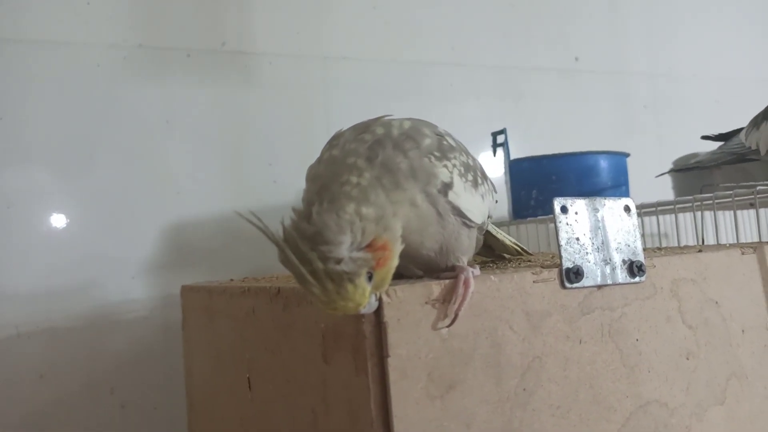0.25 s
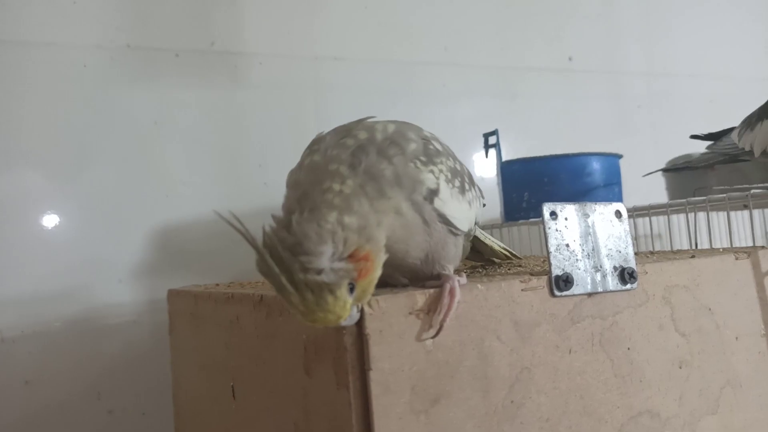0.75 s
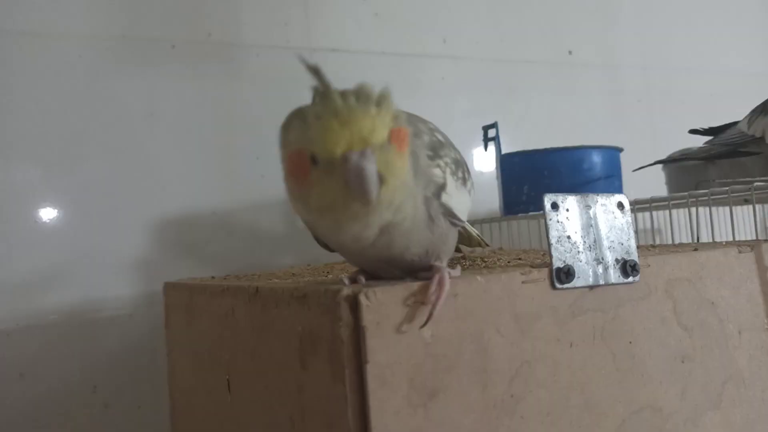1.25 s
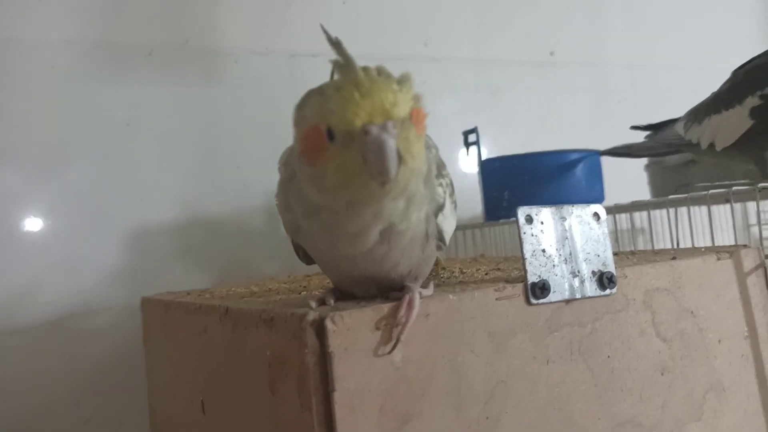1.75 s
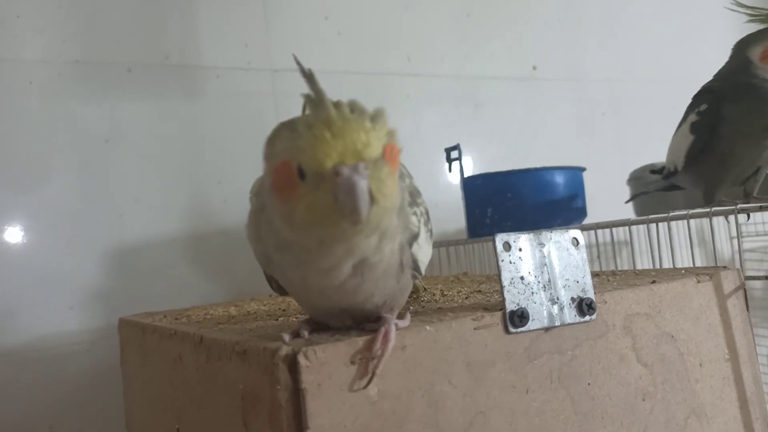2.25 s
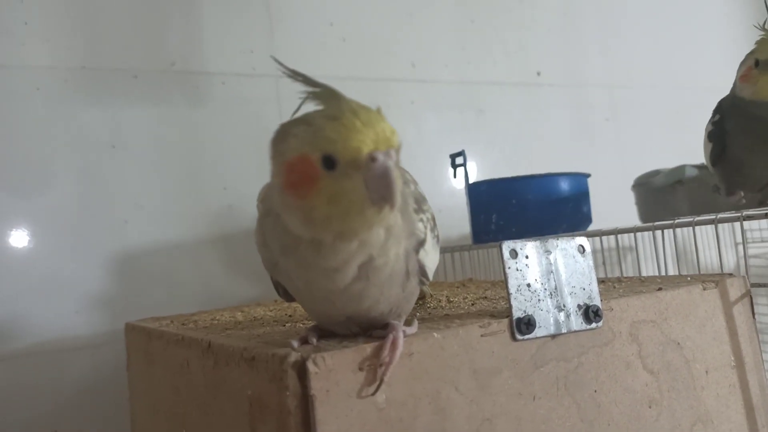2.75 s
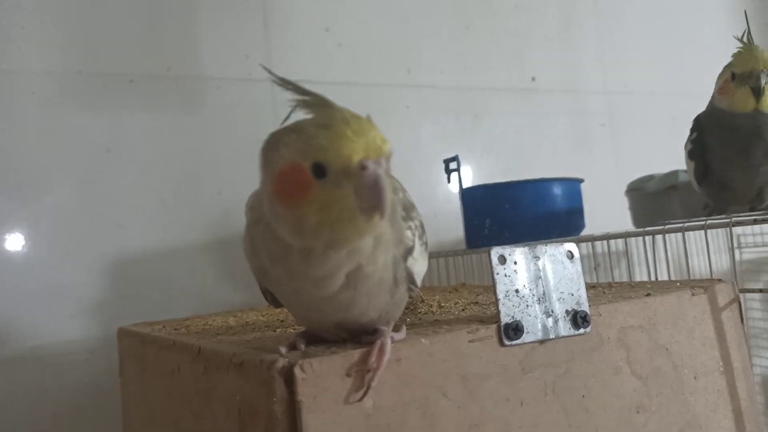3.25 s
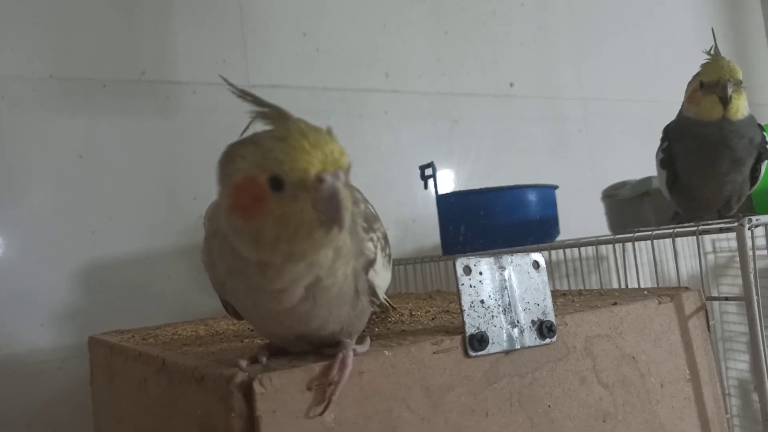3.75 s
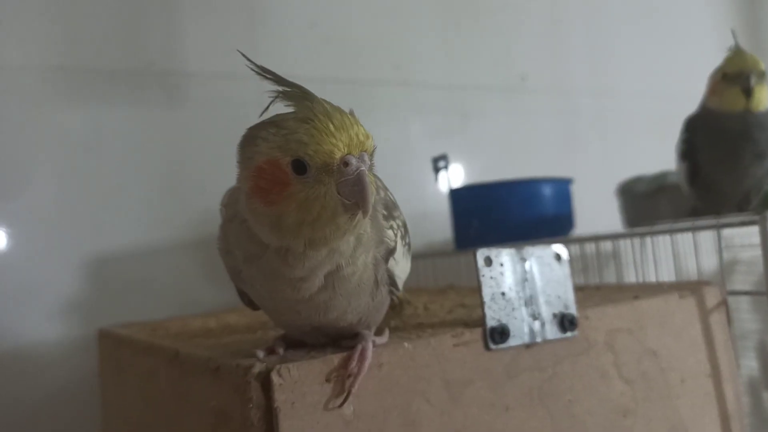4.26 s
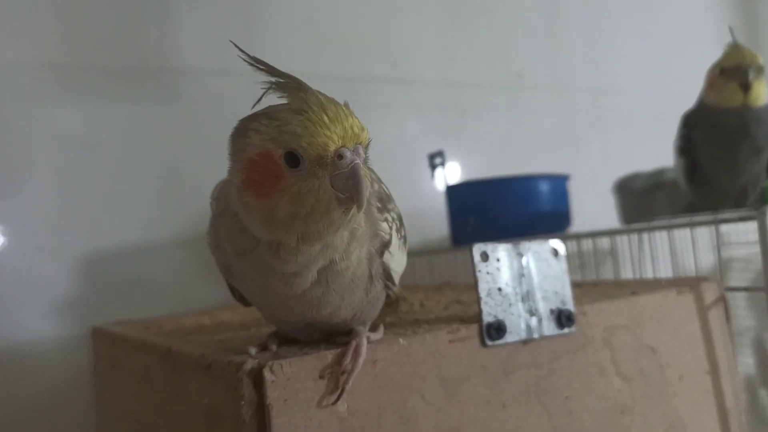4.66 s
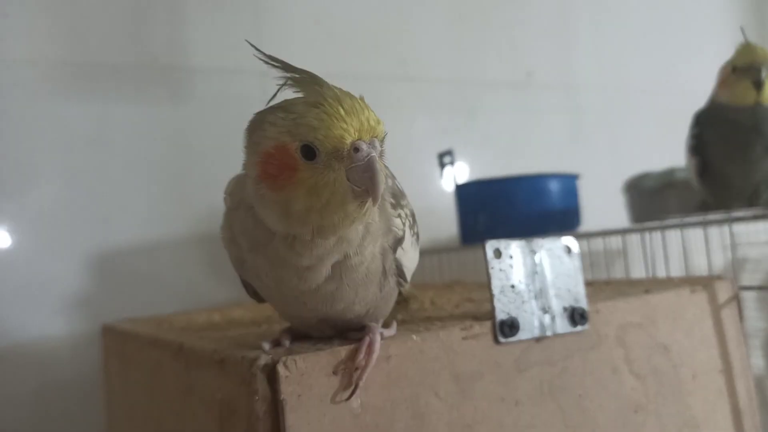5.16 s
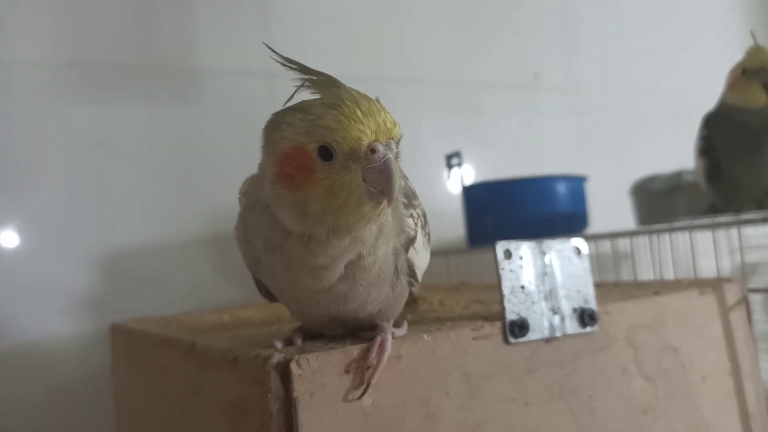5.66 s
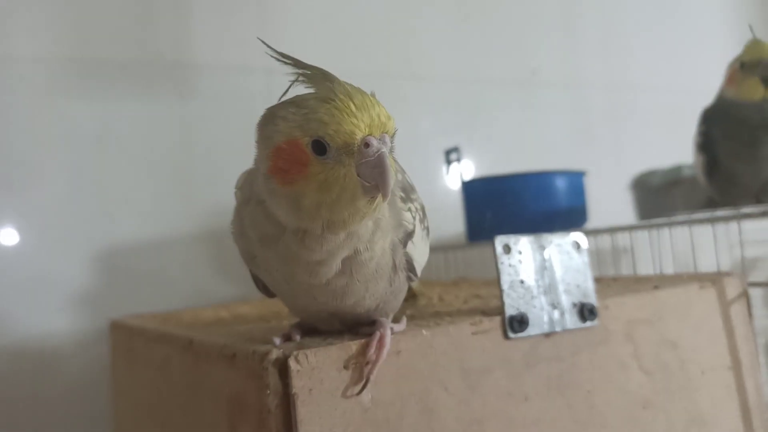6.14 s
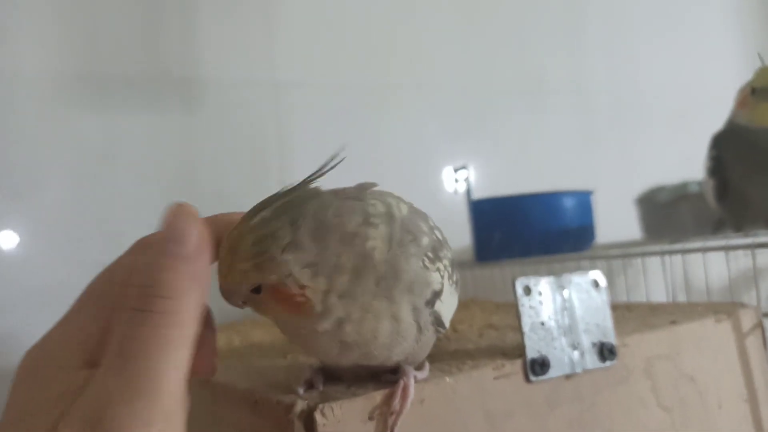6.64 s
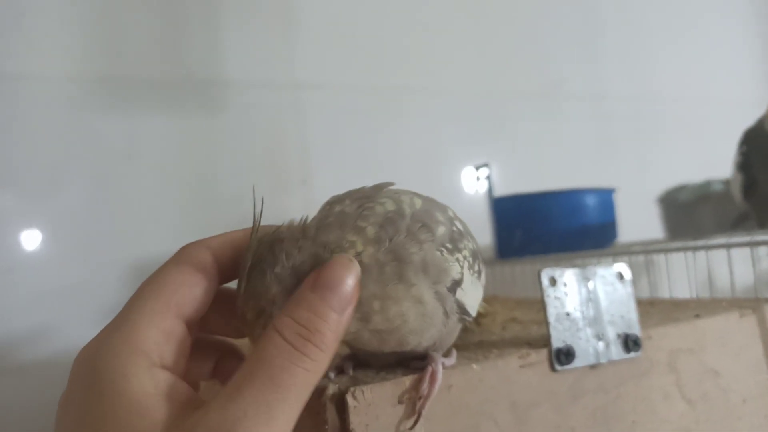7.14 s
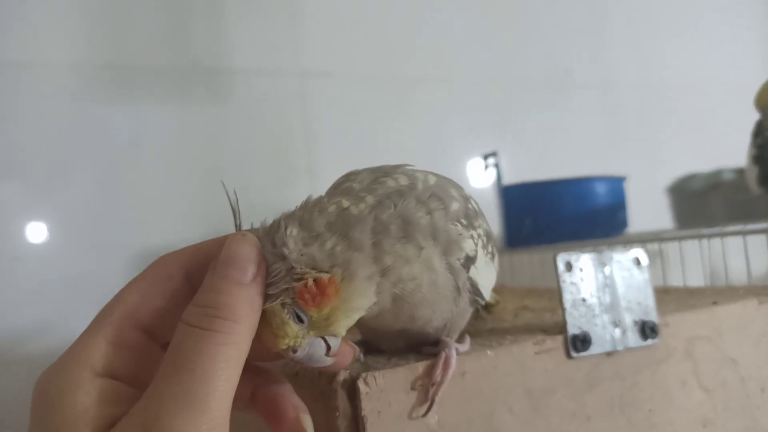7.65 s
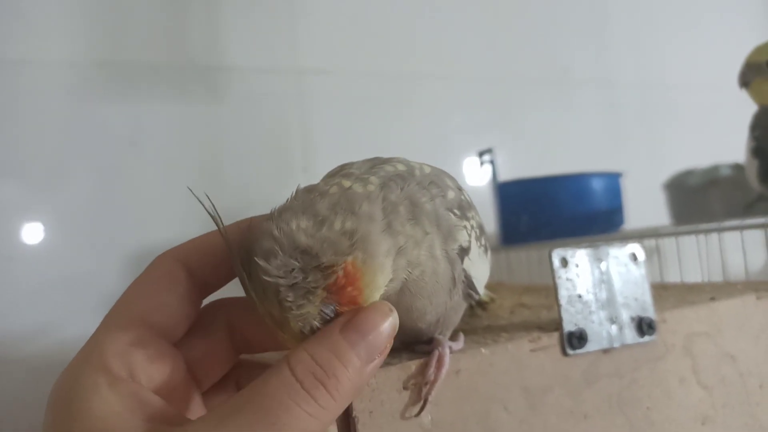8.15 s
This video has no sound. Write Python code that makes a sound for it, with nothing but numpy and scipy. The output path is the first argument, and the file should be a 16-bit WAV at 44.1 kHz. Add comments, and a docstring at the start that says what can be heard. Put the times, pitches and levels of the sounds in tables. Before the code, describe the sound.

A cockatiel calls in a small, bare, echoing room, slightly right of the microphone. Its syllables are short gliding tones that grow louder as they climb, some trilling, some turning hoarse. The first cluster of chirps runs from about 0.3 to 0.8 seconds, and another from 1.3 to 1.7. More chirps and raspy squawks follow in three quick bursts between 2.3 and 3.7 seconds. After a short gap comes the busiest run, from 4.6 to 6 seconds. The bird then falls quiet, and a hand shuffles faintly at about 6.4 seconds. From 7.5 seconds come softer calls, with one clearer rising and falling chirp near 8 and a small last one at 8.4. Beak and claws tick lightly now and then, most often around 7.6 to 8.1 seconds. A low, wavering hum and a faint feather rustle continue underneath.

```python
"""Over a low hum and a faint feather rustle, a cockatiel chirps and squawks in a small, bare, echoing
room. It stands on a cardboard box beside a cage, a little nearer the right microphone of a stereo pair.
Each syllable is a gliding tone from the syrinx, louder as it climbs, that trills or turns hoarse.
Beak and claws tick now and then; late on, a hand shuffles in and the bird settles to softer calls.
The recorder leaves a treble gap near 9-11 kHz, and its limiter holds down the loudest calls."""
import sys
import numpy as np
from scipy import signal
from scipy.fft import rfft, irfft, next_fast_len
from scipy.io import wavfile
from scipy.ndimage import uniform_filter1d, minimum_filter1d

SR = 44100
rng = np.random.default_rng(int(sys.argv[2]) if len(sys.argv) > 2 else 0)


def persist_wave(psi):
    """Save psi, clipped to +-1, as 16-bit WAV."""
    counts = np.round(np.clip(psi, -1, 1) * 32767).astype(np.int16)
    wavfile.write(sys.argv[1], SR, np.atleast_2d(counts).T)


N = 370440  # 8.4 s


def amp(db):
    """Decibels to gain."""
    return 10 ** (np.asarray(db) / 20)


def unit_rms(x):
    """Scales to rms 1."""
    return x / np.sqrt(np.mean(abs(x) ** 2) + 1e-20)


def curve_at(points, hz):
    """Reads rows of (f/Hz, value) on a log-frequency axis."""
    f, value = np.transpose(points)
    return np.interp(np.log(hz + 1), np.log(f + 1), value)


def add(mix, start_s, sound):
    """Mixes a sound in at start_s."""
    part = mix[max(round(start_s * SR), 0):][:len(sound)]
    part += sound[:len(part)]


def coloured(x, points, scale=1):
    """Filters by rows of (f/Hz, level/dB), the levels multiplied by scale."""
    size = next_fast_len(x.shape[-1] + 512)
    gain = amp(scale * curve_at(points, np.fft.rfftfreq(size, 1 / SR)))
    return irfft(rfft(x, size) * gain, size)[..., :x.shape[-1]]


def wander(count, hz):
    """Smooth random drift of rms 1, up to about hz."""
    size = next_fast_len(count + SR // 4)
    f = np.fft.rfftfreq(size, 1 / SR)
    spectrum = rfft(rng.standard_normal(size)) / np.sqrt(1 + (f / hz) ** 6)
    return unit_rms(irfft(spectrum, size))[:count]


def phase_of(hz):
    """Running phase of a changing frequency, in radians."""
    return 2 * np.pi * np.cumsum(hz) / SR


def swells(rows, rest):
    """Gain over time: bell-shaped swells on top of a resting gain."""
    t = np.arange(N) / SR
    power = sum(amp(db) ** 2 * np.exp(-((t - middle) / width) ** 2) for middle, width, db in rows)
    return np.sqrt(rest ** 2 + power)


def room_tone(level_db=-52):
    """Still air: a low rumble, alike at both microphones, and a faint hiss that differs between them."""
    # colour of rumble and hiss, with the recorder's 9-11 kHz gap: f/Hz, relative level/dB
    air_colour = [(25, -24.5), (50, -33.5), (75, -14.5), (100, -1.5), (130, -10), (160, -17.5),
                  (280, -10.5), (400, -19.5), (550, -24.5), (900, -27), (2000, -41.5), (5500, -43),
                  (8300, -40.5), (9500, -57.5), (11200, -63), (12300, -45), (15500, -47)]
    # likeness of left and right: f/Hz, correlation/0-1
    correlation = [(30, .5), (70, 1), (170, 0.86), (330, 0.84), (600, 0.31), (1500, 0), (15000, 0.03)]
    alike = curve_at(correlation, np.fft.rfftfreq(N, 1 / SR))
    left, unrelated = rfft(rng.standard_normal((2, N)))
    right = alike * left + np.sqrt(1 - alike ** 2) * unrelated
    return amp(level_db) * unit_rms(coloured(irfft(np.array([left, right]), N), air_colour))


def hum(pitch_hz=134, rest_db=-59, trim_db=-2):
    """A low, wavering hum in the centre that swells and fades."""
    # partials of the hum: harmonic number, relative level/dB
    partials = [(1, 2.5), (2, -12.5), (3, -18.5), (5, -23.5)]
    # its swells: middle t/s, half-width/s, level before the trim/dB
    hum_swells = [(1.12, 0.036, -49), (1.66, 0.18, -42), (2.18, 0.089, -48), (5.26, 0.083, -40.5),
                  (5.78, 0.085, -42.5), (6.2, 0.23, -44), (7.26, 0.11, -45), (7.76, 0.038, -45),
                  (8.04, 0.054, -44)]
    phase = phase_of(pitch_hz + 3 * wander(N, 8))
    tone = sum(amp(db) * np.sin(k * phase) for k, db in partials)
    tone *= 1 + .3 * wander(N, 12)
    return amp(trim_db) * swells(hum_swells, amp(rest_db)) * unit_rms(tone)


def friction(colour, grain_db=1.0):
    """Rubbing noise of rms 1 that comes in small uneven clumps."""
    grains = rng.standard_normal((2, N)) * amp(grain_db * wander(N, 60))
    return unit_rms(coloured(grains, colour))


def feathers(rest_db=-57, settle_s=6.2, settle_db=-7):
    """Feathers and feet shift on the box; the faint rustle drops as the bird settles to be stroked."""
    # fidgets: middle t/s, half-width/s, level/dB
    fidgets = [(.1, 0.75, -58.5), (2.91, 0.019, -44), (3.25, 0.4, -54.5), (5.44, .04, -48.5),
               (7.86, 0.15, -49.5)]
    # colour of the rustle, with the recorder's 9-11 kHz gap: f/Hz, relative level/dB
    rustle_colour = [(300, -17), (1500, -4.5), (4300, -2), (5400, -8), (7500, 0), (8500, -7), (9200, -25.5),
                     (11300, -26.5), (12300, -8.5), (15500, -12)]
    settled = np.clip((np.arange(N) / SR - settle_s) / 0.24, 0, 1)
    return swells(fidgets, amp(rest_db + settle_db * settled)) * friction(rustle_colour)


def breath(t, hz, effort_db, fade_db, onset_db):
    """A syllable's gain: more breath pressure makes the voice both higher and louder, never steadily."""
    attack_s, release_s, build_s = 0.0023, 0.0089, 0.017
    mid_hz, db_per_octave = 2660, 10
    let_go_db, let_go_octaves_per_s = -5.5, 40
    level_db = effort_db + fade_db * t / t[-1] + onset_db * np.exp(-t / build_s)
    level_db += db_per_octave * np.log2(hz / mid_hz) + 2.5 * wander(len(t), hz=44.7)
    # a quick drop in pitch is the breath being let go: the voice fades with it
    falling = np.clip(-np.gradient(np.log2(hz)) * SR / let_go_octaves_per_s, 0, 1)
    level_db += let_go_db * uniform_filter1d(falling ** 2, size=300)
    ramp = np.clip(np.minimum(t / attack_s, (t[-1] - t) / release_s), 0, 1)
    return np.sin(np.pi / 2 * ramp) ** 2 * amp(level_db)


def syrinx(hz, hoarse, trill_octaves, shrill_db):
    """A harmonic tone and its rasp: pressed hard, the membranes beat unevenly and spread sidebands."""
    trill_hz, quaver_hz, rasp_hz, undertone_hz, top_hz = 50.63, 87.64, 620, 1780, 9800
    screech_hz, screech_width_hz, screech_db = 2000, 350, 28
    overtone_db_per_octave, flicker_db = -7, 3
    count = len(hz)
    # passing the screech pitch, a hoarse voice breaks towards its octave
    shrill_db = shrill_db + screech_db * hoarse * np.exp(-((hz - screech_hz) / screech_width_hz) ** 2)
    if trill_octaves > .11:  # wide swings of pitch are slower and more regular than narrow ones
        flutter_hz = np.full(count, trill_hz)
    else:
        flutter_hz = quaver_hz * (1 + .2 * wander(count, 40))
    jitter_octaves = .014 * wander(count, 140) + .08 * hoarse * wander(count, 450)
    hz = hz * 2 ** (trill_octaves * np.cos(phase_of(flutter_hz)) + jitter_octaves)
    phase = phase_of(hz)
    tone = np.sin(phase)
    for k in range(2, 8):
        # a soft voice loses all its overtones; a shrill one gains most at the octave
        lift_db = shrill_db if k == 2 else np.minimum(shrill_db, .91 * shrill_db)
        level_db = overtone_db_per_octave * np.log2(k) + lift_db + flicker_db * wander(count, 270)
        blur = 1.1 * (k - 1) * hoarse * wander(count, 490)  # uneven cycles blur high overtones most
        tone += amp(level_db) / (1 + (k * hz / top_hz) ** 8) * np.sin(k * phase + blur)
    rasp = np.sin(phase_of(rasp_hz * (1 + .5 * wander(count, 120))))
    tone *= 1 + .85 * hoarse * (rasp + .74 * wander(count, 1800))
    # in a hoarse call the other side of the syrinx buzzes along on a low, unsteady note
    tone += amp(-4) * hoarse * np.sin(phase_of(undertone_hz * (1 + .07 * wander(count, 250))))
    return tone, rasp


def breathy_voice(tone, rasp, loudness, hoarse):
    """The tone and its hiss take on the voice's colour; torn air fizzes in time with the rasp."""
    # colour of the voice, with the recorder's 9-11 kHz gap: f/Hz, relative level/dB
    voice_colour = [(600, -14.5), (1000, -14.5), (1500, -9), (2200, 3.5), (3200, 2.5), (3650, 1),
                    (4600, 0.5), (5400, -16.5), (6100, -9), (6800, -3), (8200, -7.5), (9200, -49),
                    (11300, -35), (12500, 0), (15500, -22.5)]
    # colour of the fizz, with the same gap: f/Hz, relative level/dB
    fizz_colour = [(1000, -33.5), (5000, -11.5), (7500, 0.5), (9200, -27), (11300, -20.5), (12500, 3),
                   (15500, 4)]
    count = len(tone)
    push = (loudness / loudness.max()) ** .19  # the air hisses more as the bird pushes harder
    hiss = amp(-21) * push * (hoarse + .42) * rng.standard_normal(count)
    voice = coloured(tone + hiss, voice_colour)
    voice /= np.sqrt(uniform_filter1d(voice ** 2, size=500) + 1e-9)  # the breath sets the level
    puffs = rng.standard_normal(count) * (1 + rasp) * amp(6.5 * wander(count, 130))
    fizz = amp(-17) * push * (hoarse + .08) * unit_rms(coloured(puffs, fizz_colour))
    return loudness * (voice + fizz)


def cockatiel():
    """Breath drives the syrinx; each syllable is a little louder on the left or the right. One faint, steady
    whistle near 1400 Hz at about 0.94 s comes from another bird."""
    # syllables: effort/dB, change over the length/dB, onset offset/dB, hoarseness at start/0-1,
    # at end/0-1, trill depth/octaves, overtone lift/dB, left minus right/dB, melody [(t/s, f/Hz), ...]
    syllables = [ (-38.5, -24.5, -4, 0.74, 1, 0.023, -14, -0.5, [(0, 3750), (.05, 3260)]),
                 (-24.5, 5.5, -9.5, 0.017, .03, .18, 1, 1, [(.257, 1960), (.305, 2524), (.345, 2660),
                 (.378, 2607), (.395, 1580)]), (-14, 5, -7.5, .2, .45, 0.073, -3.5, 2, [(.478, 1788),
                 (.5, 2200), (.545, 2709), (.63, 3200), (.67, 2912), (.715, 2414)]),
                 (-16, 10, 0.5, 0.28, .12, 0.082, 1.5, 2, [(.708, 2376), (.77, 2265), (.79, 1600)]),
                 (-4.5, -2, -12.5, 0.14, .2, 0.014, 15, -1, [(.546, 1654), (.57, 2028), (.595, 2214),
                 (.612, 2150)]), (-28.5, -15.5, -1, .03, 0.074, .015, -19, 1.5, [(.935, 1394),
                 (1.07, 1375)]), (-8, -1, -18.5, 0.37, 0.062, 0.058, 1, 1.5, [(1.256, 1274), (1.283, 1700),
                 (1.3, 2112), (1.325, 2450), (1.35, 3150), (1.385, 3093), (1.425, 2282)]),
                 (-7, -10.5, -3.5, 0.088, 0.089, .055, -1.5, 1.5, [(1.42, 2268), (1.465, 2135),
                 (1.51, 2471), (1.555, 3024), (1.6, 3193), (1.65, 3233), (1.68, 2916)]),
                 (-11, 4, -7, 0.38, .2, 0.011, 2, 1.5, [(2.319, 1389), (2.34, 1908), (2.36, 2239),
                 (2.412, 2602)]), (-12, 2, -4.5, .08, 0.042, 0.016, -2.5, 2, [(2.408, 3220), (2.42, 3288),
                 (2.484, 3137)]), (-6.5, -16, -1, 0.057, .03, 0.05, -2, 2.5, [(2.484, 2570), (2.51, 2329),
                 (2.58, 2413), (2.68, 2423)]), (-19, -7, -5.5, 0.085, 0.26, 0.036, -8, 1.5, [(2.908, 1525),
                 (2.935, 1950), (2.968, 1878)]), (-7.5, 9.5, -13, 0.32, 0.57, .05, 3.5, 1, [(2.958, 1960),
                 (2.972, 1964), (3.004, 2170)]), (-12, 0.5, -6, 0.081, 0.26, .02, -1, 3, [(2.997, 3203),
                 (3.05, 3315), (3.08, 3240), (3.095, 2825), (3.115, 1446)]),
                 (-17.5, -11.5, -5.5, 0.02, 0.55, 0.062, -11.5, 1.5, [(3.349, 1280), (3.39, 1650),
                 (3.422, 1957), (3.428, 2525), (3.475, 2795), (3.51, 2414)]),
                 (3, -17.5, -11.5, 0.17, 0.49, 0.058, 6, 1, [(3.507, 934), (3.54, 1019), (3.568, 1048)]),
                 (-24, -5.5, -1.5, .06, 0.032, 0.046, -5, -4, [(3.564, 1460), (3.585, 1652), (3.615, 1785),
                 (3.635, 1794), (3.655, 1420)]),
                 (-12.5, -2.5, -10.5, 0.35, 0.483, 0.1, -5, 1, [(4.587, 1700), (4.602, 2202), (4.633, 2405),
                 (4.64, 2730), (4.7, 3115), (4.745, 3275), (4.8, 3000), (4.86, 2832)]),
                 (-12.5, 0.5, 7, .4, 0.073, 0.056, 0.5, 1.5, [(4.885, 1715), (4.915, 2120), (4.938, 2349),
                 (4.96, 2800), (4.985, 2750), (5.018, 2060)]),
                 (-9.5, 0, -3, .1, 0.19, .01, -1, -0.5, [(5.012, 1759), (5.058, 1790)]),
                 (-6.5, -12, -3, 0.042, .1, 0.02, 6, 2.5, [(5.046, 1970), (5.058, 2306), (5.09, 2353),
                 (5.12, 2276)]), (-20, 0, -7.5, 0.0488, .05, .14, 4.5, -2, [(5.135, 2300), (5.19, 2900),
                 (5.22, 2700), (5.246, 1777)]), (-6, -3, -8, 0.31, 0.34, 0.054, 0, 3.5, [(5.507, 1424),
                 (5.53, 1807), (5.55, 2200), (5.585, 2455), (5.615, 3000), (5.645, 2724)]),
                 (-9.5, -1.5, -4, 0.41, .25, .02, -3.5, 0.5, [(5.638, 1770), (5.675, 1800)]),
                 (-3.5, -15, 1, 0.14, .1, 0.037, 2, 2, [(5.663, 1865), (5.69, 2371), (5.73, 2336),
                 (5.765, 2317)]), (-5.5, 4, -5, .2, 0.81, 0.057, 10, 2.5, [(5.788, 1944), (5.83, 2174)]),
                 (-8.5, -5.5, -10, .03, 0.25, 0.0072, -1, 3, [(5.823, 3287), (5.86, 3385), (5.915, 3364),
                 (5.948, 3234), (5.965, 1580)]), (-63, -5.5, -5.5, .05, .05, .008, -8, -9, [(7.52, 3010),
                 (7.59, 3000)]), (-54, -3.5, -5, .05, .05, .008, -15, -7, [(7.685, 3020), (7.75, 2990)]),
                 (-37, -15, -3, .2, 0.15, .06, -35, -1, [(7.7, 1400), (7.79, 1430)]),
                 (-23, 7.5, -6, 0.029, .01, 0.03, -4, -0.5, [(7.842, 1543), (7.865, 1663), (7.895, 1870),
                 (7.93, 2286), (7.965, 2582), (7.995, 2628), (8.025, 2402), (8.046, 1750)]),
                 (-26.5, -11, -5, 0.068, .15, 0.05, -13.5, 1, [(8.343, 1410), (8.37, 1614), (8.399, 1320)])]
    calls = np.zeros((2, N))
    for effort_db, fade_db, onset_db, hoarse_from, hoarse_to, trill, lift_db, pan_db, melody in syllables:
        times, pitches = np.transpose(melody)
        start = times[0]
        t = np.arange(0, times[-1] - start, 1 / SR)
        hz = np.interp(start + t, times, pitches)
        hoarse = np.linspace(hoarse_from, hoarse_to, len(t))
        loudness = breath(t, hz, effort_db, fade_db, onset_db)
        tone, rasp = syrinx(hz, hoarse, trill, lift_db)
        voice = breathy_voice(tone, rasp, loudness, hoarse)
        add(calls[0], start, amp(pan_db / 2) * voice)
        add(calls[1], start, amp(-pan_db / 2) * voice)
    return calls


def room(x, direct_db=-6, early_db=-7, tail_db=-3, early_decay_s=0.0088):
    """Direct sound, a few echoes off the near wall and box, then a dense tail, unlike left and right."""
    # reverberation of the bare room: f/Hz, time to fall 60 dB/s
    t60 = [(300, 1), (1500, 0.61), (2500, 0.62), (3400, 0.56), (4600, 0.52), (7000, 0.42), (10000, 0.26),
           (15000, 0.16)]
    t = np.arange(SR) / SR
    signs = rng.choice([-1., 1.], (2, SR))
    early = signs * (rng.random((2, SR)) < 500 / SR) * np.exp(-t / early_decay_s) * (t > .0015)
    dense = signs * (rng.random((2, SR)) < 3000 / SR) * np.clip(t / 0.004, 0, 1)
    hz, frame_s, spectra = signal.stft(dense, SR, nperseg=256)
    decay = amp(-60 * frame_s / curve_at(t60, hz)[:, None])
    tail = signal.istft(spectra * decay, SR, nperseg=256)[1][:, :SR]
    response = sum(amp(db) * part / np.linalg.norm(part, axis=1, keepdims=True)
                   for db, part in [(early_db, early), (tail_db, tail)])
    response[0, 15] += amp(direct_db)  # the left microphone is about 12 cm farther from the bird
    response[1, 0] += amp(direct_db)
    return signal.fftconvolve(np.atleast_2d(x), response, axes=1)[:, :N]


def beak_and_claws(decay_s=0.004):
    """Beak and claws make short snaps; some ring on in the room."""
    # snaps: t/s, dry peak level/dB, top-treble lift/half-dB steps, relative send to the room/dB
    ticks = [(1.095, -35, -11, 12), (1.759, -37, -5.5, -1.5), (2.073, -32, 11, -1.5),
             (2.778, -35, -12, 1.5), (4.351, -47, -0.5, 13), (4.39, -45.5, 6.5, 8),
             (6.347, -49.5, -11.5, 12), (6.591, -40.5, -27.5, -2), (6.763, -47, -7, -4),
             (7.608, -48, 22, -6), (7.735, -32, -7, 7), (7.774, -35, 5, -4), (7.849, -31.5, -29, 15),
             (8.12, -25.5, 4.5, -1.5)]
    # colour of a snap, with the recorder's 9-11 kHz gap: f/Hz, relative level/dB
    tick_colour = [(300, -15.5), (1500, -13.5), (4000, -9), (5500, -13.5), (7500, 3), (9000, -31.5),
                   (11300, -20.5), (12200, 3), (15500, -8)]
    direct, sent = np.zeros((2, N))
    t = np.arange(2048) / SR
    for start, peak_db, brightness, send_db in ticks:
        snap = coloured(rng.standard_normal(len(t)) * np.exp(-t / decay_s), tick_colour)
        snap /= abs(snap).max()
        snap = coloured(snap, [(7000, 0.087), (13000, 1)], scale=brightness / 2)
        add(direct, start, amp(peak_db) * snap)
        add(sent, start, amp(peak_db + send_db) * snap)
    return direct + room(sent, direct_db=-20, early_db=-10, tail_db=5.5)


def hand():
    """A soft shuffle of friction as a hand reaches for the bird."""
    # movements: middle t/s, half-width/s, level/dB
    shuffles = [(6.37, 0.027, -51), (6.48, 0.1, -56)]
    # colour of the shuffle: f/Hz, relative level/dB
    shuffle_colour = [(100, -19), (500, 6), (1100, 0), (1800, 2), (4000, -2), (9000, -43)]
    return swells(shuffles, rest=0) * friction(shuffle_colour)


def scene():
    """The bird and its echoes, the small noises around it and the room tone, at the stereo pair."""
    return room(cockatiel()) + beak_and_claws() + feathers() + hand() + room_tone() + hum()


def record(dry):
    """Two unevenly coloured microphones, a quick limiter that looks a few ms ahead, then a band limit."""
    threshold_db, cut_per_db, recovery_db_per_s, ceiling = -6.5, 0.19, 90, .85
    band_limit_hz = 15800
    # imbalance of the microphones: f/Hz, left minus right/dB
    balance = [(100, 1.5), (1000, -1), (2400, -6.5), (3300, -4.5), (4500, -1), (7500, 5), (13000, -3)]
    mics = np.array([coloured(dry[0], balance, 1 / 2), coloured(dry[1], balance, -1 / 2)])
    level_db = 20 * np.log10(abs(mics).max(0) + 1e-9)
    peak_db = -minimum_filter1d(-level_db, size=300)
    recovery_db = np.arange(N) * recovery_db_per_s / SR
    held_db = np.maximum.accumulate(peak_db + recovery_db) - recovery_db
    over_db = np.maximum(held_db - threshold_db, 0)
    cut_db = np.maximum(cut_per_db * over_db, held_db - 20 * np.log10(ceiling))
    limited = mics / amp(uniform_filter1d(cut_db, size=300))
    lowpass = signal.firwin(511, band_limit_hz, window=("kaiser", 9), fs=SR)
    return signal.oaconvolve(limited, lowpass[None], "same")


dry = scene()
out = record(dry)
persist_wave(out)
```